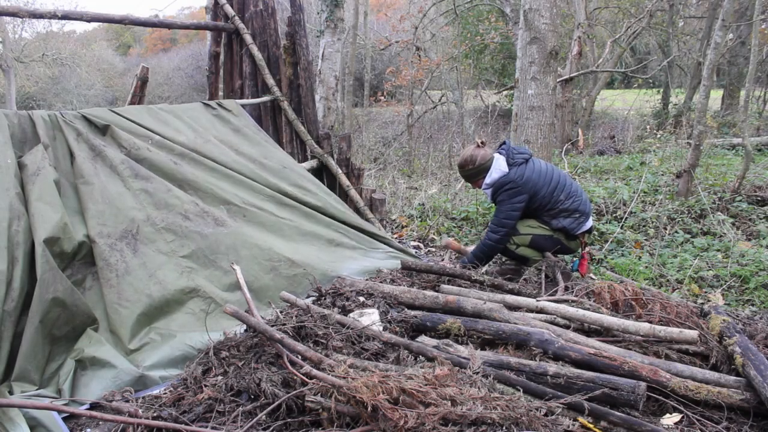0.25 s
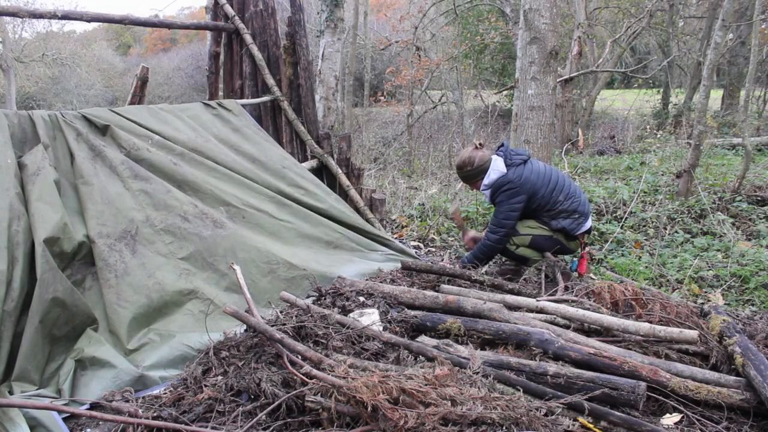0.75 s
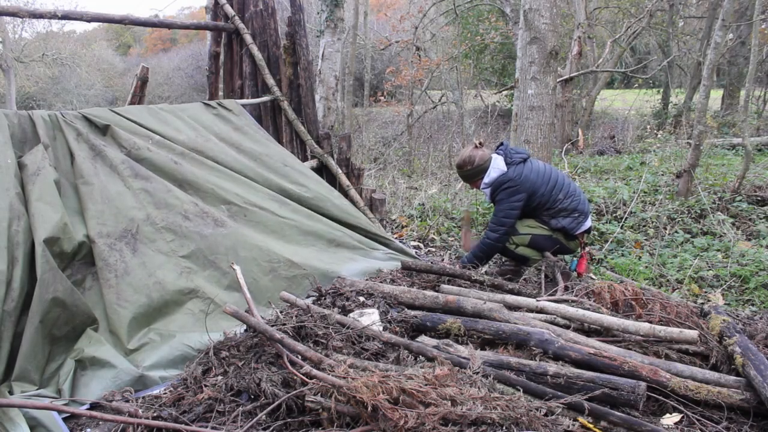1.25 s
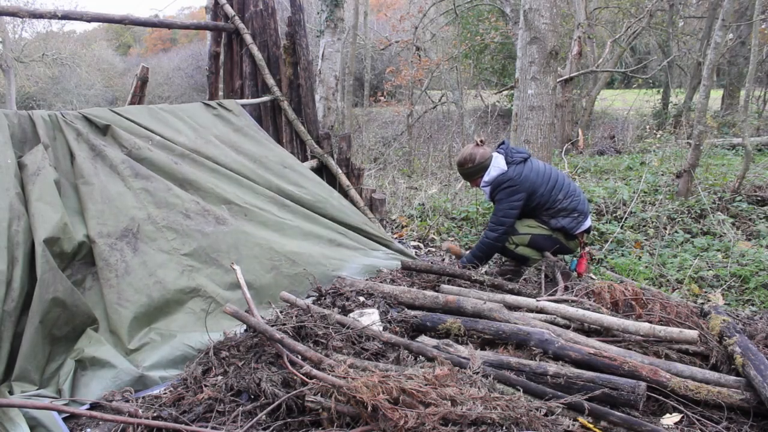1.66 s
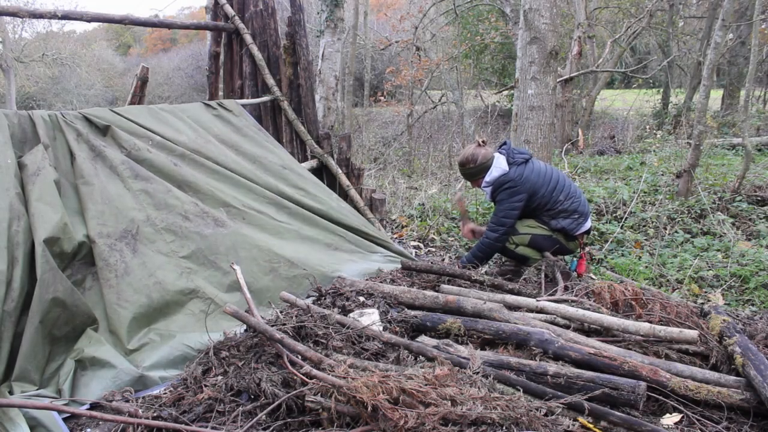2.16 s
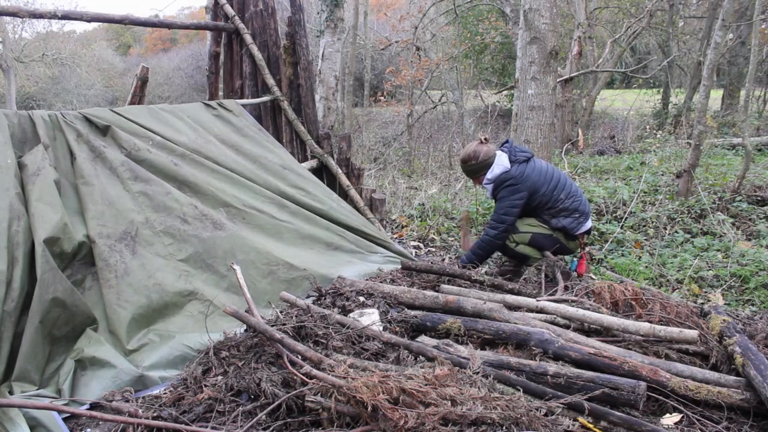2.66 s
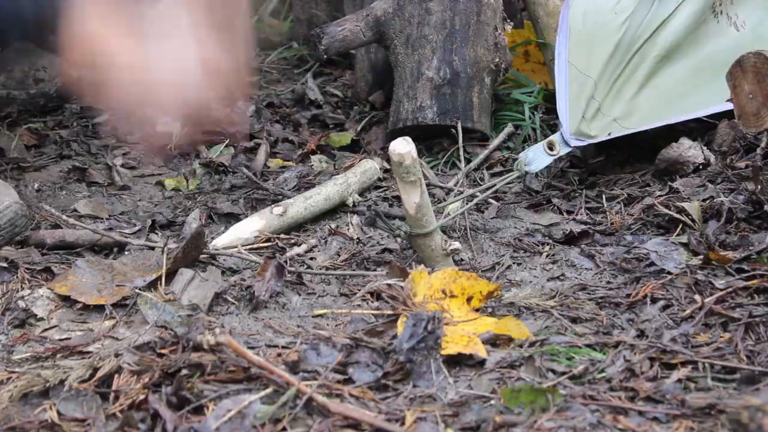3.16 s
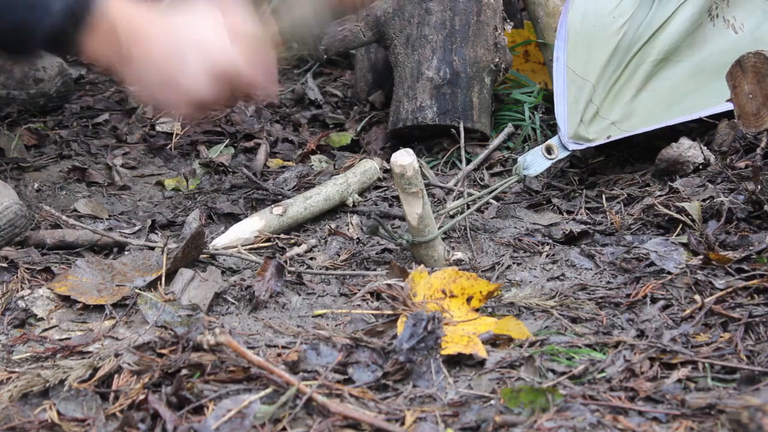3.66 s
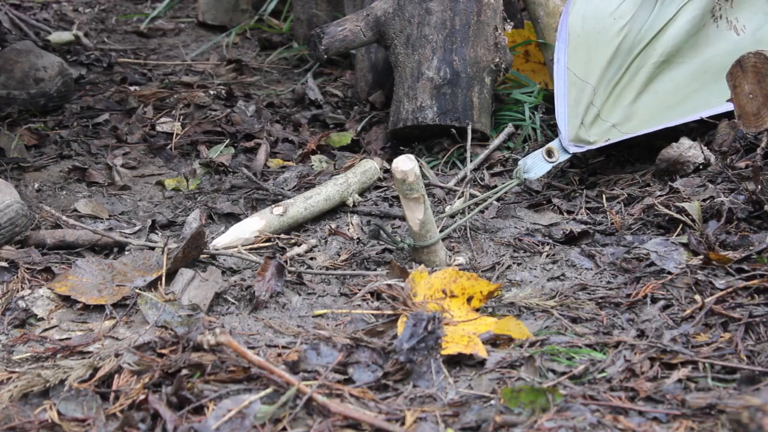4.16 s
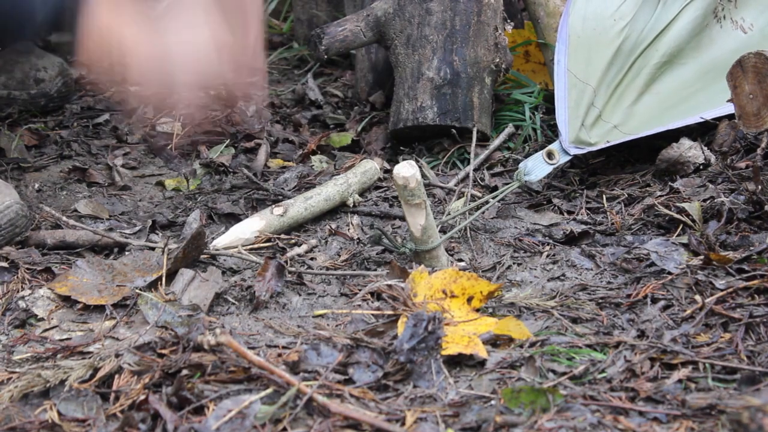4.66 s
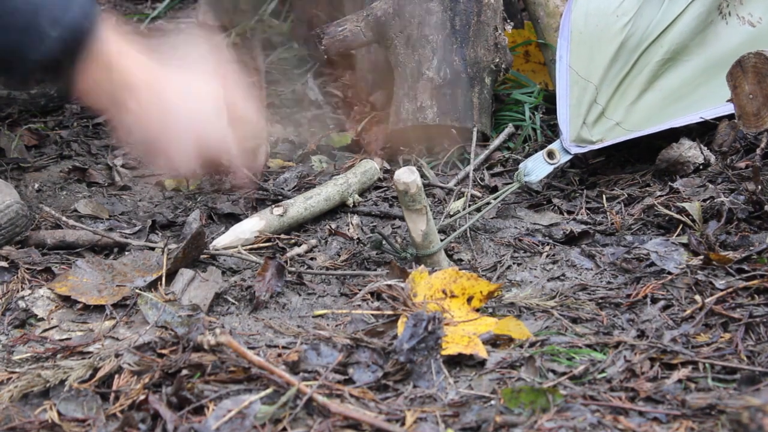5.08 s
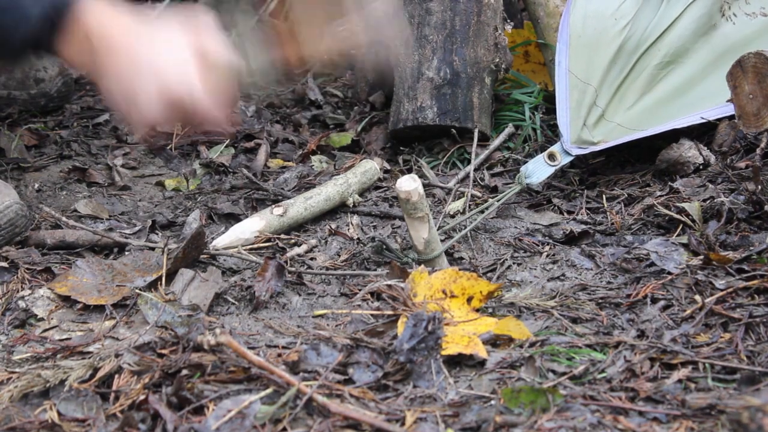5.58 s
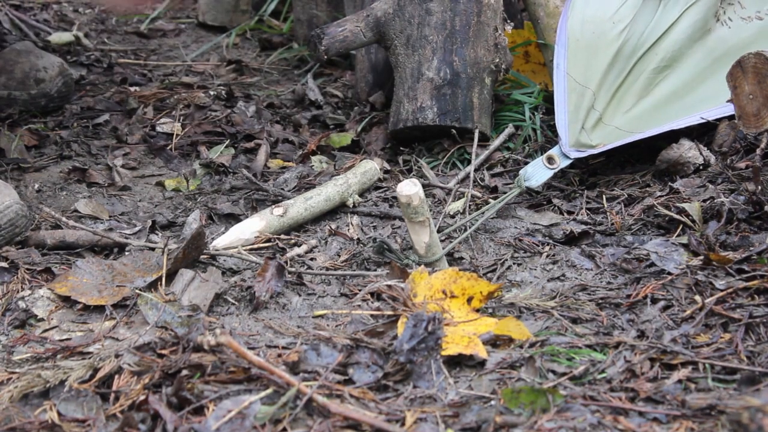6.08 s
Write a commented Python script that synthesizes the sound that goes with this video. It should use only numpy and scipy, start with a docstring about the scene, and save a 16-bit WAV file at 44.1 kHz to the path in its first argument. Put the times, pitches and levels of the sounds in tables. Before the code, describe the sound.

Steady peg hammering outdoors, about three blows a second. The first eight are bright, hard wooden cracks at a small distance, thickened by close reflections and a short grainy tail from the trees. After a small gap, nine close blows hit hard and dry, clipping a little, the last ones softer. Jacket fabric rustles between them, with a couple of tiny wooden ticks. Early on, a hoarse bird and thin peeps sound over faint rumble.

```python
"""Hammering tent pegs in the woods

A short log serves as a mallet: eight blows on a peg a few metres off, then nine on one right by the microphone.
Each blow sums decaying peg modes, a mallet note and noise cracks; logs and trunks answer with decaying noise.
Shaped noise makes the sleeve's swish, the wooden ticks, the distant rumble and the wash of open country.
Gliding sines call as faint birds, short pressure pulses bump the microphone, and the input clips loud knocks.
"""
import sys
import numpy as np
from scipy import signal
from scipy.fft import rfft, irfft
from scipy.io import wavfile
from scipy.ndimage import uniform_filter1d

SR = 44100
rng = np.random.default_rng(int(sys.argv[2]) if len(sys.argv) > 2 else 0)


def generate_wav(sig):
    """Save sig (samples, or channels by samples) to the path in sys.argv[1] as 16-bit PCM at SR."""
    pcm = np.round(np.clip(np.atleast_2d(sig).T, -1, 1) * 32767).astype(np.int16)
    wavfile.write(sys.argv[1], SR, pcm)


N = 279153
T = np.arange(N) / SR
RING = T[:SR // 4]  # time axis of one short hit


def undb(db):
    """Decibels to gain."""
    return 10 ** (np.asarray(db) / 20)


def unit(x):
    """Scale to rms 1."""
    return x / np.sqrt(np.mean(x ** 2))


def add(out, start_s, x):
    """Mix x into out from start_s, cutting whatever runs past the end."""
    i = max(int(start_s * SR), 0)
    out[i:i + len(x)] += x[:max(N - i, 0)]


def noise(spectrum, size):
    """Noise of rms 1, its colour drawn through (frequency [Hz], level [dB]) points on a log axis."""
    hz, db = np.transpose(spectrum)
    bin_hz = np.fft.rfftfreq(size, 1 / SR)
    gain = undb(np.interp(np.log(bin_hz + 1), np.log(hz), db))
    white = rng.standard_normal(size)
    return unit(irfft(rfft(white) * gain, size))


def walk(rate_hz):
    """Smooth random drift of rms near 1: random steps at rate_hz, averaged over one step."""
    k = max(int(SR / rate_hz), 1)
    steps = np.repeat(rng.standard_normal(N // k + 1), k)
    return unit(uniform_filter1d(steps, k)[:N])


def fade(t, t60):
    """Free decay, 60 dB down after t60 seconds."""
    return np.exp(-np.log(1000) * t / t60)


# background level before gain and drift: (time [s], bass level [dB], wash level [dB])
AIR_LEVELS = [(0.0, -42, -48.5), (0.49, -39, -45), (0.69, -44, -48), (1.53, -42, -46.5), (1.82, -46, -48),
              (3.33, -46, -51), (6.33, -52, -57.5)]
# colour of the distant rumble: (frequency [Hz], level [dB])
RUMBLE_COLOUR = [(4, -45), (25, -13), (42, -16.5), (62, -2), (76, 3), (100, -8.5), (140, -7), (200, -13),
                 (300, -21), (450, -22.5), (900, -66)]
# colour of the wash of open country: (frequency [Hz], level [dB])
WASH_COLOUR = [(150, -15), (250, -7), (479, -7.5), (569, -7), (904, -1.5), (1990, -15), (3270, -19.5),
               (3880, -21.5), (5370, -25), (6590, -25.5), (8970, -34.5), (13800, -47.5), (15000, -85)]
WASH_GAIN_DB, DRIFT_DB, DRIFT_HZ = 2, -1.5, 24.4


def air():
    """Low rumble and an even wash, dying down overall; both waver together, the wash half as much in dB."""
    s, bass_db, wash_db = np.transpose(AIR_LEVELS)
    drift_db = DRIFT_DB * walk(DRIFT_HZ)
    bass = noise(RUMBLE_COLOUR, N) * undb(np.interp(T, s, bass_db) + drift_db)
    wash = noise(WASH_COLOUR, N) * undb(np.interp(T, s, wash_db) + .5 * drift_db + WASH_GAIN_DB)
    return bass + wash


def note(length_s, hz, arch, rough):
    """Phase and envelope of a bird note: pitch arches up to hz and back, with random wavering."""
    u = np.linspace(0, 1, int(length_s * SR))
    pitch = hz * (1 - arch * (2 * u - 1) ** 2 + rough * walk(1500)[:len(u)])
    phase = 2 * np.pi * np.cumsum(pitch) / SR
    return phase, np.sin(np.pi * u)


# brief whistles of other birds:
# (time [s], length [s], top pitch [Hz], level [dB], arch [share of the pitch])
PEEPS = [(0.099, 0.037, 8400, -53, .035), (0.124, .03, 8100, -56, .02), (0.221, 0.049, 8250, -53, .035),
         (0.153, .04, 2750, -52, .1), (0.213, 0.053, 2800, -51, 0.124), (0.362, 0.058, 1430, -45, 0.068),
         (0.418, 0.02, 1440, -38, 0.11), (0.437, 0.034, 1556, -44.5, .12)]
# the hoarse call, as (first note, last note): it slows, rises and grows louder and rougher
CALL_GAP_S, CALL_HZ, CALL_DB, CALL_ROUGH = (.0415, .098), (1200, 1440), (-52.5, -46.5), (.044, .099)
CALL_START_S = .443
CALL_CURVE = 2.5  # the change gathers as a power of the note number
CALL_DUTY = .94  # share of each gap that sounds


def birds(count=16):
    """A hoarse, slowing call made of upper harmonics only, and a few nearly pure peeps."""
    out = np.zeros(N)
    harmonics = np.arange(3, 6)
    harmonic_gains = undb(-3 * np.arange(len(harmonics)))
    s = CALL_START_S
    for progress in np.linspace(0, 1, count) ** CALL_CURVE:
        gap = np.interp(progress, (0, 1), CALL_GAP_S)
        hz = np.interp(progress, (0, 1), CALL_HZ)
        db = np.interp(progress, (0, 1), CALL_DB)
        rough = np.interp(progress, (0, 1), CALL_ROUGH)
        phase, swell = note(CALL_DUTY * gap, hz, arch=.05, rough=rough)
        voice = harmonic_gains @ np.sin(np.outer(harmonics, phase))
        add(out, s, undb(db) * np.sqrt(np.abs(swell)) * voice)
        s += gap
    for s, length, hz, db, arch in PEEPS:
        phase, swell = note(length, hz, arch, rough=.014)
        add(out, s, undb(db) * swell * np.sin(phase))
    return out


# strong dull bumps on the microphone: (time [s], level [dB], frequency [Hz])
STRONG_BUMPS = [(0.076, -25, 61.4), (.109, -21.5, 266), (0.1301, -9.5, 124), (0.261, -22, 92),
                (.526, -22, 72.5)]
JOSTLE_UNTIL_S, JOSTLE_DB, JOSTLE_HZ = .71, -29, 95  # light bumps; pitch strays half an octave either way


def bumps(count=13):
    """Each bump is one short swing of pressure; light ones jostle at random among the strong ones."""
    out = np.zeros(N)
    light = []
    for k, (when, pitch) in enumerate(rng.random((count, 2))):
        light.append((JOSTLE_UNTIL_S * (k + when) / count, JOSTLE_DB, JOSTLE_HZ * 2 ** (pitch - .5)))
    for s, db, hz in list(STRONG_BUMPS) + light:
        progress = np.minimum(RING * hz / 1.42, 1)
        swing = np.sin(np.pi * progress) * np.sin(2 * np.pi * 1.31 * (.5 - progress))
        add(out, s - .002, undb(db) * swing)
    return out


# light ticks of wood: (time [s], level [dB])
TICKS = [(3.116, -26), (4.791, -34)]
# colour of a light tick: (frequency [Hz], level [dB])
TICK_COLOUR = [(200, -44), (900, -8), (2300, 7), (3600, -14), (6500, 7), (9000, -3), (13000, -36),
               (16000, -50)]


def ticks():
    """Small dry clicks between the blows: coloured noise that dies at once."""
    out = np.zeros(N)
    for s, db in TICKS:
        add(out, s, undb(db) * noise(TICK_COLOUR, len(RING)) * fade(RING, .016))
    return out


def rub(middle_s, length_s, db):
    """Speed of one arm movement: it swells, holds and dies away."""
    return undb(db) / (1 + (2 * (T - middle_s) / length_s) ** 4) ** 1.5


# colour of nylon sliding on nylon: (frequency [Hz], level [dB])
NYLON_COLOUR = [(800, 0.5), (2000, -2), (3400, -1), (4600, -1), (6000, 1.5), (7400, 2), (9000, -7.5),
                (11000, -18.5), (13500, -26), (16000, -30)]
# leads and lags run between the blow and the middle of each movement
LIFT_LEAD_S, LIFT_S, LIFT_DB = .2, .13, -49.5
SHORT_LIFTS_FROM_S, SHORT_LIFT_DB = 5.3, -65  # the last strokes are raised less far, so they swish less
DOWNSWING_LEAD_S, DOWNSWING_S = .044, .11
REBOUND_LAG_S, REBOUND_S, REBOUND_DB = .06, .18, -57


def sleeve():
    """Nylon slides on nylon at lift, downswing and rebound, swelling with arm speed and catching slightly."""
    speed = np.zeros(N)
    for s, *_, downswing_db in NEAR_BLOWS:
        lift_db = LIFT_DB if s < SHORT_LIFTS_FROM_S else SHORT_LIFT_DB
        speed += rub(s - LIFT_LEAD_S, LIFT_S, lift_db)
        speed += rub(s - DOWNSWING_LEAD_S, DOWNSWING_S, downswing_db)
        speed += rub(s + REBOUND_LAG_S, REBOUND_S, REBOUND_DB)
    catching = undb(1.46 * walk(120))
    return noise(NYLON_COLOUR, N) * speed * catching


# high ring of the wood as it lingers among the trees: (frequency [Hz], level [dB])
LINGERING_RING = [(1200, -40), (2200, -1), (2700, -9), (3000, -3), (3150, 4), (3280, -8.5), (3500, -18),
                  (6000, -71)]


def woodland(blows, colour, early_db, early_t60, late_db, late_t60, late_tilt_db, hard_tilt):
    """Nearby logs scatter each knock at once; trunks further off return a thin, grainy tail."""
    out, t = np.zeros(N), T[:SR]
    hz, db = np.transpose(colour)
    octaves = np.log2(hz / 1000)
    build = np.clip(t / .0025 - .5, 0, 1)  # silent at first, then a quick rise
    for s, blow_db, hard_db, mallet_hz, mallet_db, _, ring_db, *_ in blows:
        # a harder contact sends more treble into the trees
        tone = db + hard_tilt * hard_db * octaves
        # and the mallet's note tints the echo
        tone += 1.4 * undb(mallet_db) * np.exp(-(2 * np.log2(hz / mallet_hz)) ** 2)
        late_tone = tone + late_tilt_db * octaves
        early = undb(early_db) * noise(np.c_[hz, tone], SR) * fade(t, early_t60)
        late = undb(late_db) * noise(np.c_[hz, late_tone], SR) * fade(t, late_t60)
        ring = undb(ring_db) * noise(LINGERING_RING, SR) * fade(t, .45)
        grain_db = 2.2 * walk(300)[:SR]
        add(out, s, undb(blow_db + grain_db) * build * (early + late + ring))
    return out


# crack of wood on wood: (frequency [Hz], level [dB])
CRACK_COLOUR = [(300, -1), (900, 2.5), (2000, -8.5), (3200, -6), (4800, -8.5), (7200, -13), (9000, -23.5),
                (12000, -38.5), (16000, -60.5)]
# bright first instant of contact: (frequency [Hz], level [dB])
SNAP_COLOUR = [(1000, -3), (5000, 1), (11000, -1), (14000, -6), (16500, -17)]
SNAP_DB, SNAP_T60_S = -14, .0018
HIGH_RING_HZ, HIGH_RING_T60_S = 3209, .037  # high ring straight from the wood
SOIL_TOP_HZ = 550  # peg modes below this follow the soil thud


def knocks(blows, modes, mallet_t60, crack_db, crack_t60, contact_s, high_db):
    """Each blow rings the peg's modes and the mallet, whose note depends on where it lands; contact cracks."""
    out = np.zeros(N)
    hz, db, t60 = np.transpose(modes)
    sign = (-1) ** np.arange(len(hz))  # neighbouring modes swing in opposite directions
    push = 1 - np.exp(-RING / contact_s)
    # a thin log radiates little bass
    bass_cut = signal.butter(2, SOIL_TOP_HZ, "high", fs=SR, output="sos")
    t = RING[:, None]
    for s, blow_db, hard_db, mallet_hz, mallet_db, thud_db, ring_db, *_ in blows:
        chance = rng.standard_normal((2, len(hz)))  # no two blows ring quite alike
        pitch = hz * (1 + .012 * chance[0])
        size = undb(db + .5 * chance[1] + thud_db * (hz < SOIL_TOP_HZ))
        peg = (np.sin(2 * np.pi * pitch * t) * fade(t, t60)) @ (sign * size)
        mallet = undb(mallet_db) * np.cos(2 * np.pi * mallet_hz * RING) * fade(RING, mallet_t60)
        high = np.sin(2 * np.pi * HIGH_RING_HZ * RING) * fade(RING, HIGH_RING_T60_S)
        high *= undb(ring_db + high_db)
        crack = undb(crack_db + hard_db) * noise(CRACK_COLOUR, len(RING)) * fade(RING, crack_t60)
        snap = undb(SNAP_DB + hard_db) * noise(SNAP_COLOUR, len(RING)) * fade(RING, SNAP_T60_S)
        body = signal.sosfilt(bass_cut, push * (mallet + high + crack + snap))
        add(out, s, undb(blow_db) * (peg + body))
    return out


# blows on the far peg, part levels relative to the blow: (time [s], blow level [dB], crack [dB],
# mallet ring [Hz], mallet ring [dB], soil thud [dB], high ring of the wood [dB])
FAR_BLOWS = [(.2822, -10, 2.5, 1480, -3, -3.5, -38), (.6433, -12, 6.5, 2350, -16, 6, -46),
             (.9991, -10, -3, 2317, 2.5, 3.5, -44), (1.3465, -10.5, 3.5, 2800, -31, 4, -34),
             (1.7012, -9, 5, 2340, 5, -0.5, -35), (2.0539, -11, 3, 2910, -2, 2, -48),
             (2.3955, -8.5, 4, 2950, -22, -2, -38), (2.747, -11.5, 7, 954, 0.5, 1, -33)]
# modes of the far peg in the soil: (frequency [Hz], level [dB], t60 [s])
FAR_PEG_MODES = [(153, -13, 0.052), (326.3, -24.5, 0.12), (408.5, -13.5, 0.051), (620, -5.5, 0.012),
                 (765.5, -2.5, 0.039), (1039, 3, 0.017), (1283, -3, 0.044), (1550, -8.5, 0.021),
                 (2070, -7, 0.014), (2407, 1, 0.0093), (3093, -6, 0.027), (3410, -5.5, 0.012),
                 (6530, -9, 0.015)]
# colour that the trees send back from the far peg: (frequency [Hz], level [dB])
FAR_WOOD_COLOUR = [(100, 3), (330, -3), (600, 1), (850, -1.5), (1350, 4), (1900, -10), (3100, -7.5),
                   (4200, -13), (7500, -21), (9500, -36), (15000, -57)]
# echoes from the ground, the log pile and the shelter: (delay [s], gain [linear])
FAR_ECHOES = [(.0029, .3), (.0066, .16), (0.0133, .16)]


def far_peg():
    """Knocks from a few metres off, thickened by close echoes and the answer of the trees."""
    direct = knocks(FAR_BLOWS, FAR_PEG_MODES, mallet_t60=.015, crack_db=-1.5, crack_t60=.018,
                    contact_s=.00011, high_db=1)
    out = direct + woodland(FAR_BLOWS, FAR_WOOD_COLOUR, early_db=-9.5, early_t60=.13,
                            late_db=-30.5, late_t60=.65, late_tilt_db=1.0, hard_tilt=.33)
    for delay, gain in FAR_ECHOES:
        add(out, delay, gain * direct)
    return out


# blows on the near peg, columns as for the far peg plus the sleeve's downswing: (time [s],
# blow level [dB], crack [dB], mallet ring [Hz], mallet ring [dB], soil thud [dB],
# high ring of the wood [dB], sleeve level [dB, independent of the blow])
NEAR_BLOWS = [(3.2213, 5, 0.5, 1336, 1.5, -5, -49.5, -47.5), (3.6034, 3.5, 2, 1377, 4.5, 2.5, -58, -39.5),
              (3.9834, 4.5, -2, 1355, 0, 0.5, -57, -46), (4.3666, 6, -2, 1340, 1, 1, -52, -47),
              (4.7484, 4.5, -1.5, 1395, -4.5, -2, -66, -44), (5.1316, 1, -1.5, 1765, 7.5, -11, -43.5, -52),
              (5.5106, 1.5, 1, 1780, 6.5, -12, -43.5, -51.5), (5.892, 1, -4, 623, -5, -3, -57, -52),
              (6.2734, -1.5, -3, 827, 6.5, -0.5, -58, -53)]
# modes of the near peg in the soil: (frequency [Hz], level [dB], t60 [s])
NEAR_PEG_MODES = [(193, -27, 0.047), (286, -12, 0.018), (403, -33.5, 0.073), (676.5, -15.5, 0.033),
                  (791, -9, 0.018), (971, -3, 0.016), (1113, -4.5, 0.024), (1364, -3.5, 0.015),
                  (1747, -2, 0.0062), (1944, -4.5, 0.016), (2500, -8.5, 0.0067), (3200, -32.5, 0.036)]
# colour that the trees send back from the near peg: (frequency [Hz], level [dB])
NEAR_WOOD_COLOUR = [(100, 1.5), (250, -10), (520, -16.5), (900, -5.5), (1200, -0.5), (1750, -7),
                    (2500, -17.5), (3200, -20), (3600, -21.5), (7000, -24), (10000, -38.5), (15000, -57)]


def near_peg():
    """Close, dry knocks: the same wood-on-wood contact, with far less of the trees."""
    direct = knocks(NEAR_BLOWS, NEAR_PEG_MODES, mallet_t60=.013, crack_db=-2, crack_t60=.017,
                    contact_s=.000088, high_db=26)
    return direct + woodland(NEAR_BLOWS, NEAR_WOOD_COLOUR, early_db=-25.5, early_t60=.14,
                             late_db=-45, late_t60=.78, late_tilt_db=1.5, hard_tilt=.39)


def scene():
    """The camp, heard through one microphone."""
    background = air() + birds() + bumps()
    handling = ticks() + sleeve()
    return (background + handling + far_peg() + near_peg())[None]


TOP_HZ = 16300


def record(dry):
    """The overloaded input clips loud peaks; a steep low-pass then cuts the top."""
    clipped = np.clip(dry, -.96, .96)
    top_cut = signal.ellip(8, .2, 70, TOP_HZ, fs=SR, output="sos")
    return signal.sosfilt(top_cut, clipped)


dry = scene()
out = record(dry)
generate_wav(out)
```